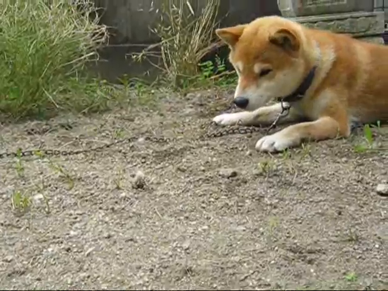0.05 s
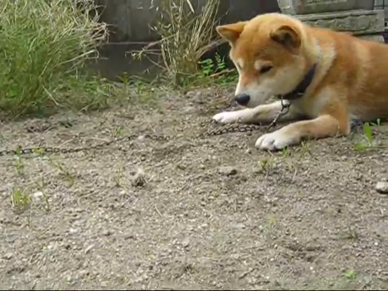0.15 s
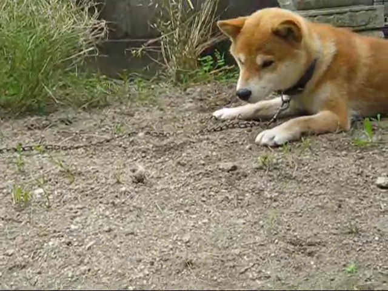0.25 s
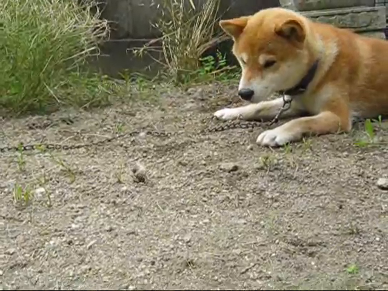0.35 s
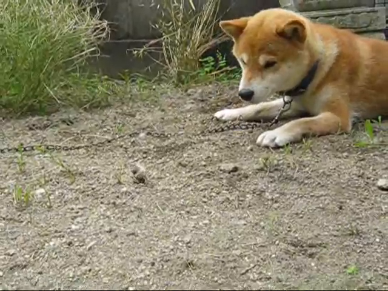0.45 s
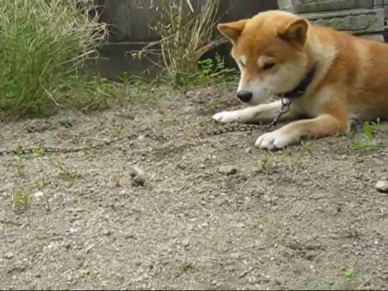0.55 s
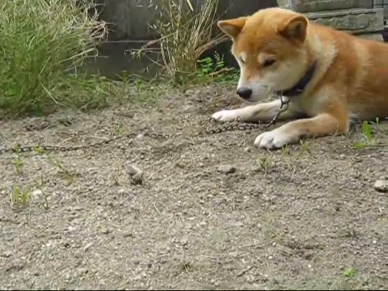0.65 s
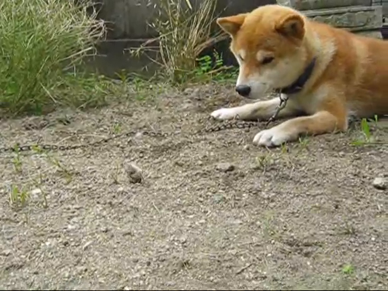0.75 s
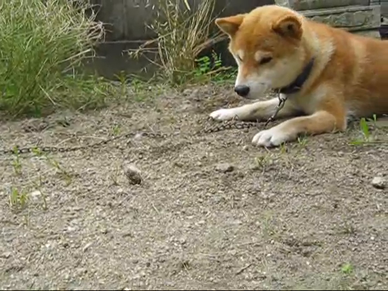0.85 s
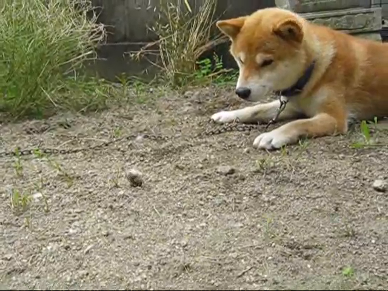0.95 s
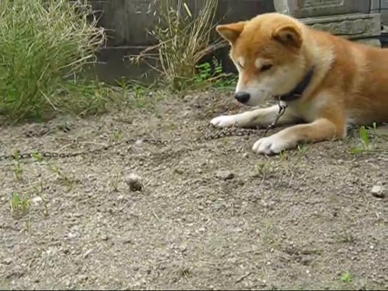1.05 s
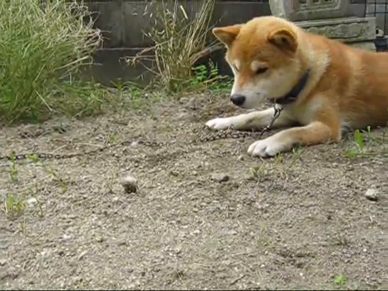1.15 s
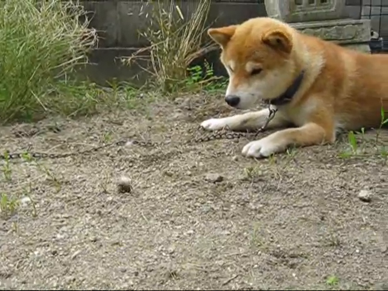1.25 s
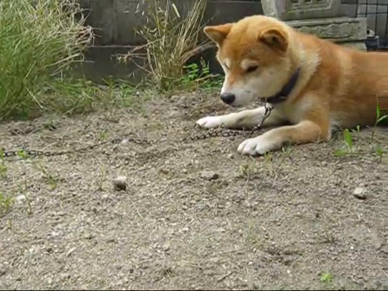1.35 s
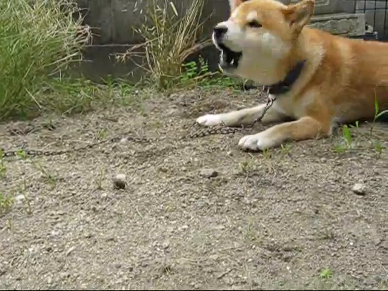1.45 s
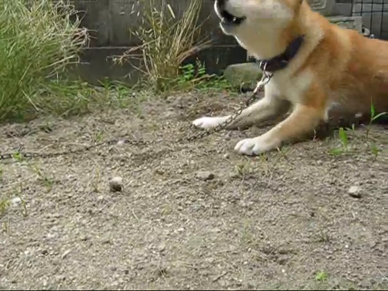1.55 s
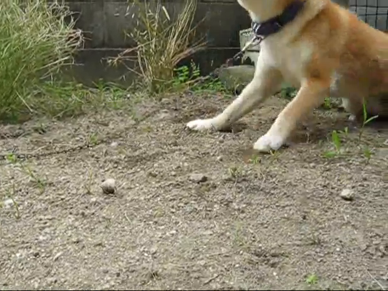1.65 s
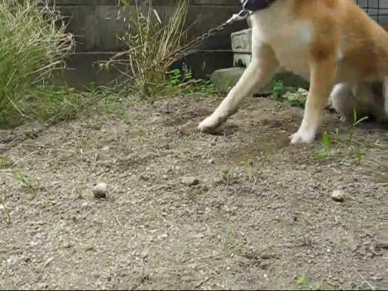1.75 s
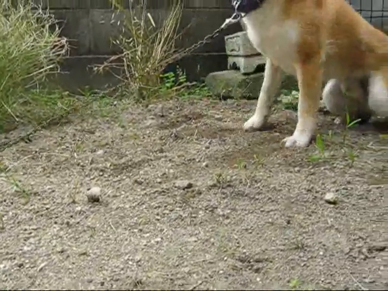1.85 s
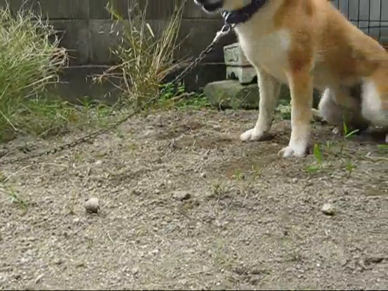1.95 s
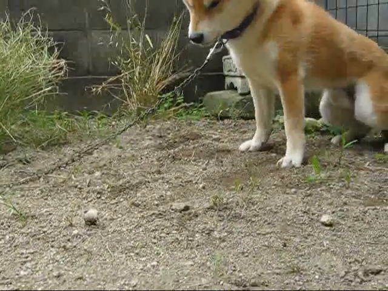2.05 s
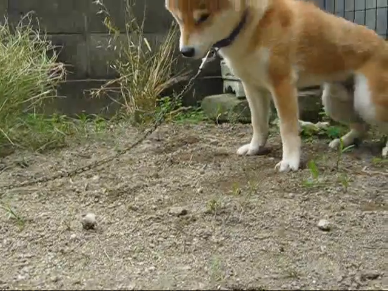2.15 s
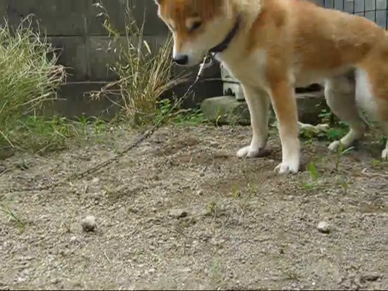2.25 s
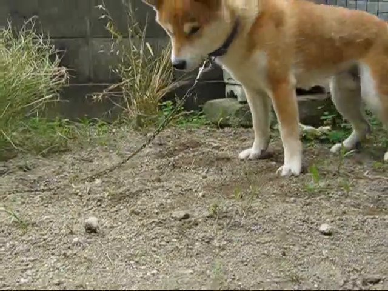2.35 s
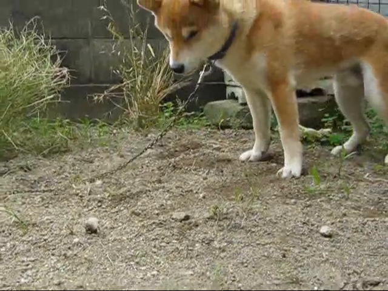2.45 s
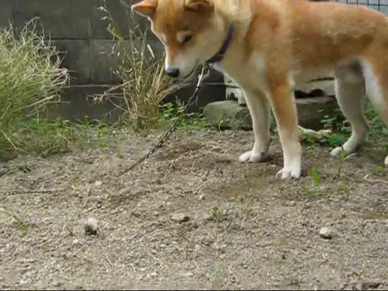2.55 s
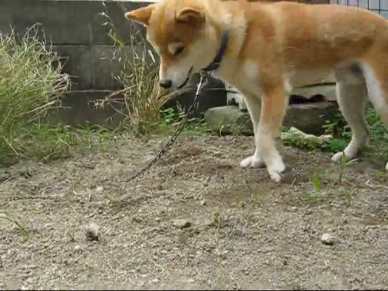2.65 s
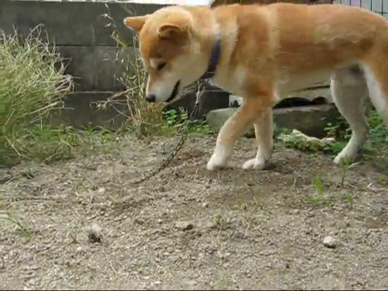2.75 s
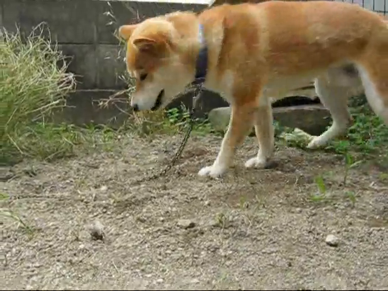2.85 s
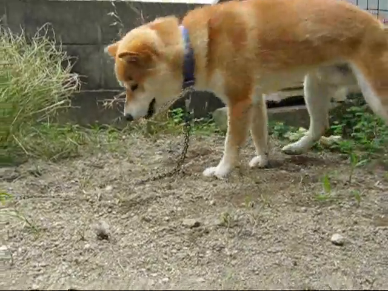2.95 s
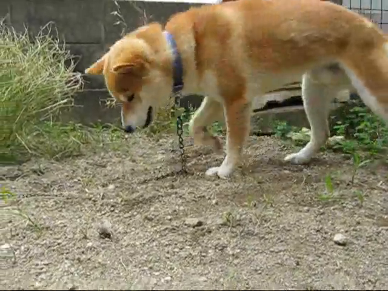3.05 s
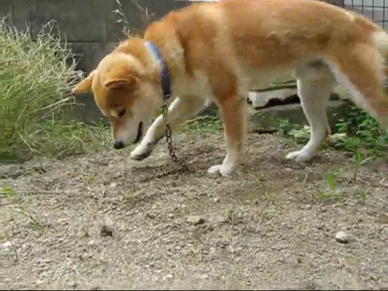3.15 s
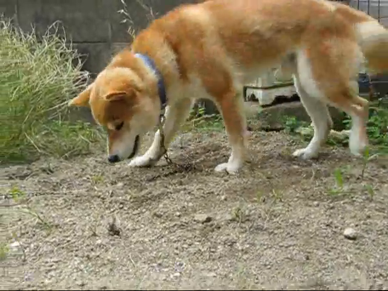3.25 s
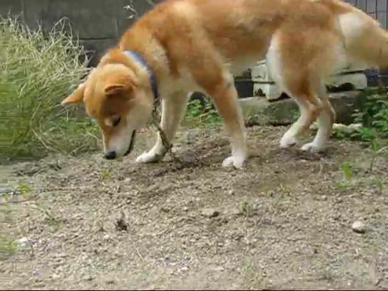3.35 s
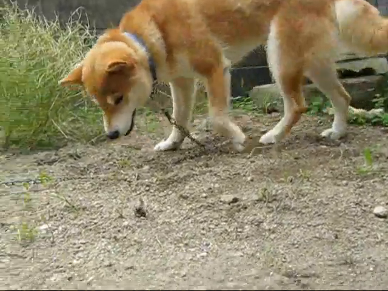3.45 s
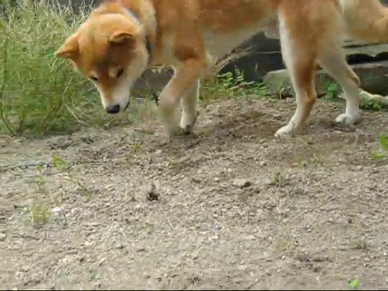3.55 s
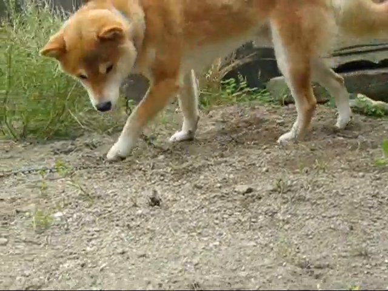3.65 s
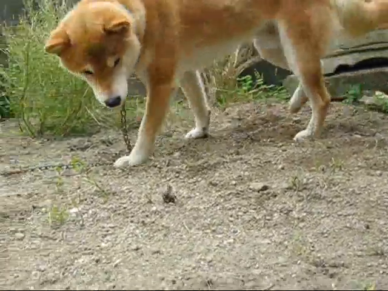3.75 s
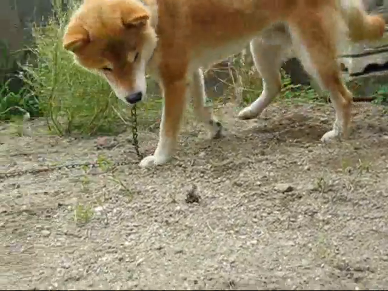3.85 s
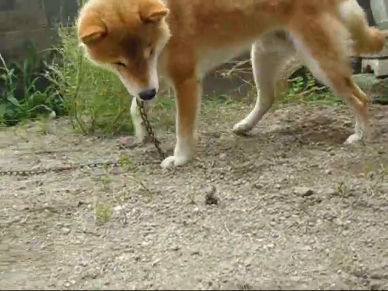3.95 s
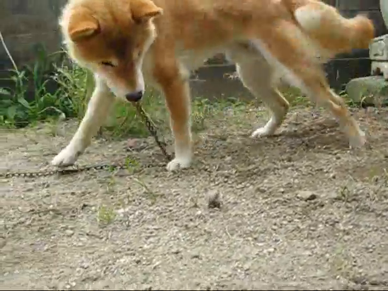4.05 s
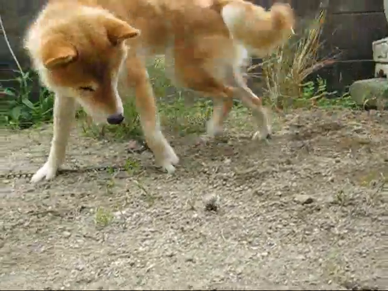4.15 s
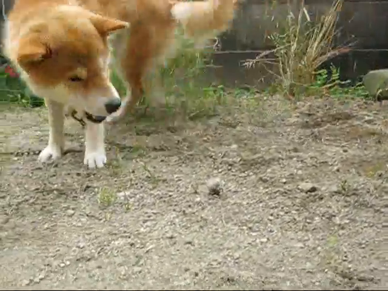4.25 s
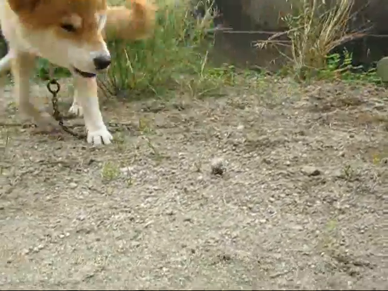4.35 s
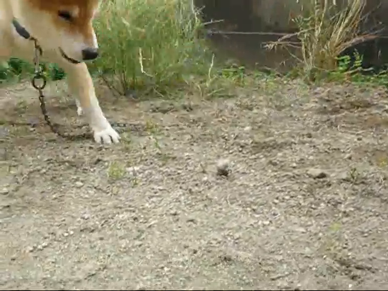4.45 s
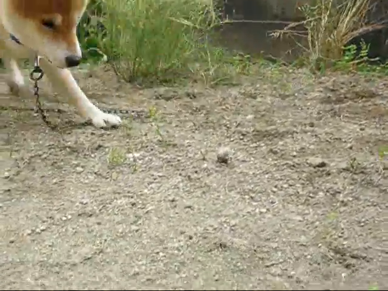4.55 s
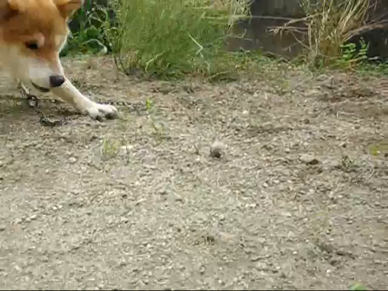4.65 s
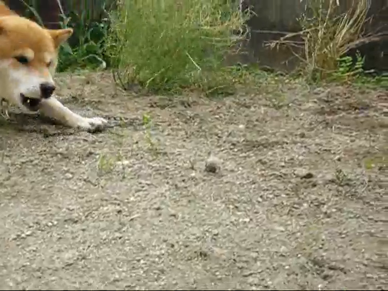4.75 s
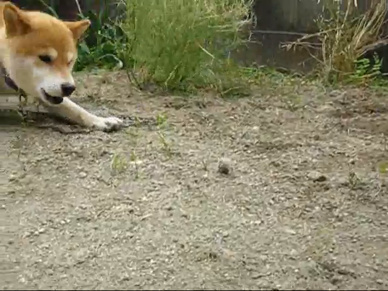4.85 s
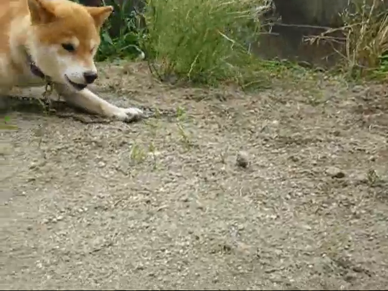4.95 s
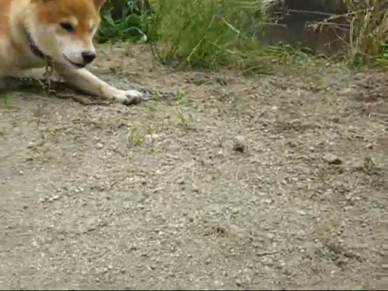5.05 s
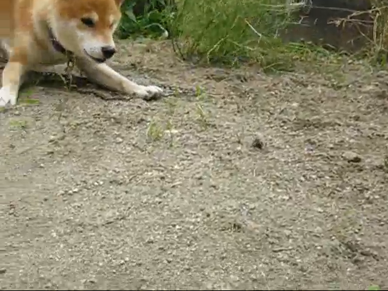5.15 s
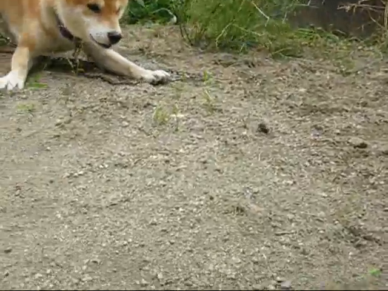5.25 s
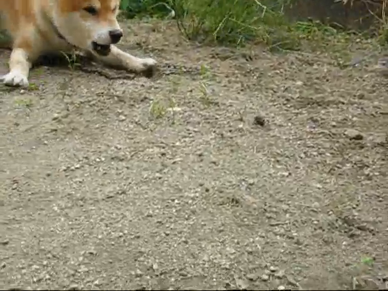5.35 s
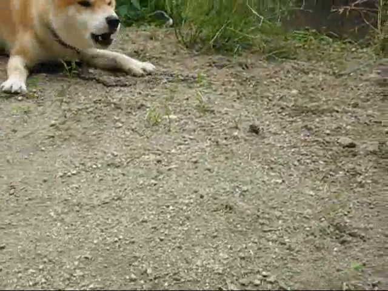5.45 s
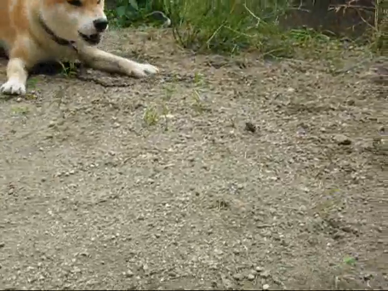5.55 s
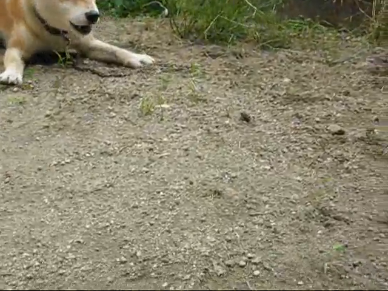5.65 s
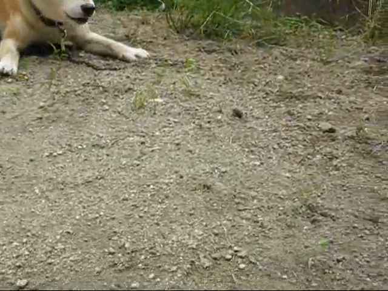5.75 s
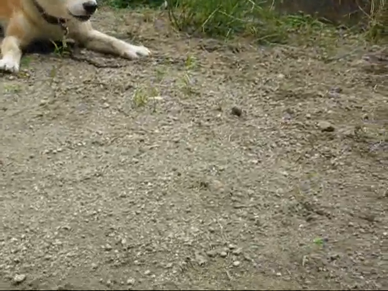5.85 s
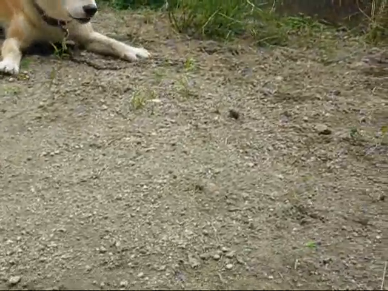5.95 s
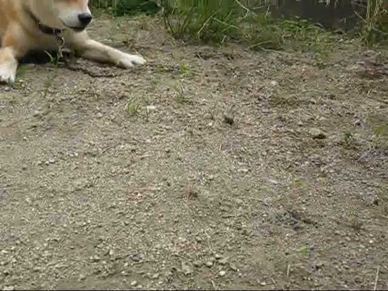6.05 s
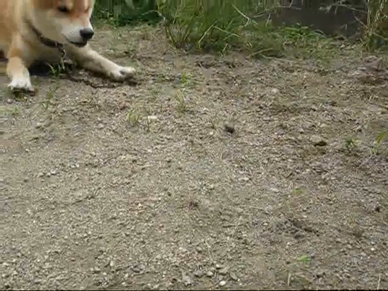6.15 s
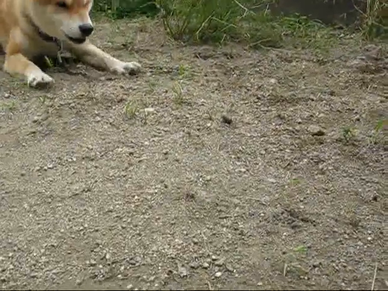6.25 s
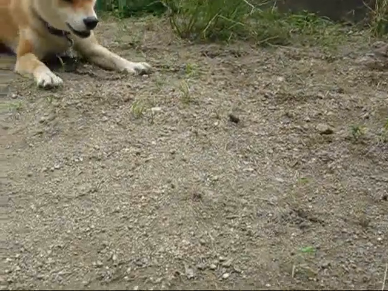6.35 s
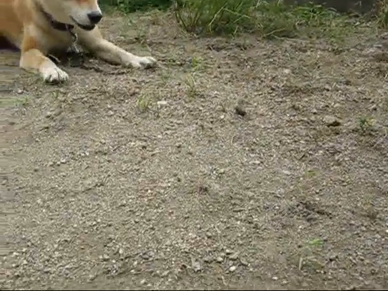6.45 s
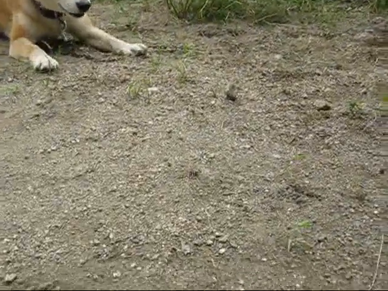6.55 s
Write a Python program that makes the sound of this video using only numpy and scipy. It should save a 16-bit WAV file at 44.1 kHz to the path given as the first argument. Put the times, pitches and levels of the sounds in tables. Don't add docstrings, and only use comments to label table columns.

```python
import sys
import numpy as np
from scipy import signal
from scipy.fft import rfft, irfft
from scipy.io import wavfile
from scipy.ndimage import uniform_filter1d

SR = 44100
rng = np.random.default_rng(int(sys.argv[2]) if len(sys.argv) > 2 else 0)


def wav_record(signal):
    frames = np.transpose(np.atleast_2d(signal))
    bounded = np.clip(frames, -1, 1)
    quanta = np.round(bounded * 32767).astype(np.int16)
    wavfile.write(sys.argv[1], SR, quanta)


def voltage_ratio(level):
    return 10 ** (np.asarray(level, float) / 20)


N = 291060
T = np.arange(N) / SR


def smooth(x, seconds):
    return uniform_filter1d(x, max(int(seconds * SR), 1))


def unit(x):
    return x / np.sqrt(np.mean(x ** 2))


def high_or_band(x, order, hz, kind):
    return signal.sosfilt(signal.butter(order, hz, kind, fs=SR, output="sos"), x)


def wobble(hz):
    return unit(high_or_band(rng.standard_normal(N), 2, hz, "low"))


def narrow(hz, width_hz):
    phase = 2 * np.pi * np.cumsum(hz) / SR
    return wobble(width_hz / 2) * np.sin(phase) + wobble(width_hz / 2) * np.cos(phase)


def resonate(x, hz, width_hz):
    r = np.exp(-np.pi * width_hz / SR)
    poles = [1, -2 * r * np.cos(2 * np.pi * hz / SR), r * r]
    return signal.lfilter(np.array([1, 0, -1]) * (1 - r * r) / 2, poles, x)


def chatter():
    out, draws = np.zeros(N), rng.random((110, 5))
    for when, long, pitch, glide, loud in draws:
        i, n = int(when * (N - SR // 10)), int((0.005 + 0.044 * long) * SR)
        hz = (3000 + 3200 * pitch) * np.linspace(1, 0.66 + 0.71 * glide, n)
        whistle = np.hanning(n) * np.sin(2 * np.pi * np.cumsum(hz) / SR)
        out[i:i + n] += voltage_ratio(-14.5 + 6.1 * loud) * whistle
    return out


# f/Hz, density/dB per Hz
AIR_COLOUR = [(30, 0.5), (100, -3.5), (250, -3.5), (500, -12), (1000, -14.5), (2000, -16.5), (3500, -18),
              (5500, -16.5)]


def air():
    hz = np.maximum(np.fft.rfftfreq(N, 1 / SR), 1)
    colour_hz, colour_db = np.transpose(AIR_COLOUR)
    colour = voltage_ratio(np.interp(np.log(hz), np.log(colour_hz), colour_db)) * (hz < SR / 8)
    noise = unit(irfft(rfft(rng.standard_normal(N)) * colour, N))
    insect_hz = 3200 + 60 * wobble(1.6)
    insect = voltage_ratio(-17.5 + 3.0 * wobble(5.2)) * narrow(insect_hz, 90)
    return noise * voltage_ratio(1.0 * wobble(5.2)) + chatter() + insect


# top t/s, top f/Hz, level/dB, rise/s, dive/s
CHIRPS = [(.001, 2066, -27, .001, .16), (.181, 2280, -32.5, 0.01, .019), (.213, 1959, -30, 0.019, 0.017),
          (.346, 2398, -30, .019, 0.03), (.494, 2232, -27.5, 0.027, .036),
          (1.326, 1995, -30, 0.035, 0.0062), (2.006, 2060, -51, 0.011, .025),
          (2.151, 1956, -46, 0.023, 0.039), (2.879, 1794, -35, .032, .008), (3.04, 1990, -33.5, .01, 0.024),
          (3.062, 1687, -34, 0.014, 0.095), (3.233, 2057, -32, .011, 0.019),
          (3.266, 1658, -35, 0.012, 0.017), (3.405, 2113, -28.5, 0.016, 0.039),
          (3.569, 2050, -28.5, 0.025, 0.034), (3.717, 1877, -31, 0.021, 0.042)]


def bird():
    start_hz, end_hz, fastest_dive_hz_per_s, longest_dive_s = 1560, 1417, 45000, 0.035
    swell_db, fade_db_per_s, octave_db = 15.5, 290.5, -27.0
    out = np.zeros(N)
    for s, top_hz, db, rise, dive in CHIRPS:
        on = (T > s - rise) & (T < s + min(dive, longest_dive_s))
        age = T[on] - s
        up, down = np.clip(-age / rise, 0, 1), np.clip(age / dive, 0, 1)
        drop_hz = min(top_hz - end_hz, fastest_dive_hz_per_s * dive)
        hz = top_hz - (top_hz - start_hz) * up ** 1.5 - drop_hz * np.sin(np.pi * down / 2) ** 2
        phase = 2 * np.pi * np.cumsum(hz) / SR
        level = voltage_ratio(db - swell_db * up ** 2 - fade_db_per_s * np.clip(age, 0, None))
        level = level * signal.windows.tukey(len(age), .25)
        out[on] += np.sqrt(2) * level * (np.sin(phase) + voltage_ratio(octave_db) * np.sin(2 * phase))
    return out


# t/s, f/Hz, glide/end over start, level/dB
TWITTER = [(.04, 3900, 0.92, -46.5), (0.086, 4050, 0.75, -47), (.088, 5000, 0.94, -47),
           (.255, 3500, 1.4, -46.5), (0.304, 3800, 1.05, -45), (.35, 3700, 1.44, -44.5),
           (0.464, 4150, .81, -44), (.485, 4600, 1.38, -48), (.504, 5500, 1.1, -36.5),
           (.524, 4950, 0.99, -43.5), (0.582, 5150, 1.07, -43), (.755, 3850, 0.57, -44),
           (.83, 4600, 1.16, -44), (1.101, 4450, 1.17, -43.5), (1.175, 3800, 1.28, -42),
           (1.281, 4050, 1.2, -41.5), (1.447, 5250, 1.06, -33), (3.005, 4980, 1.36, -42.5),
           (3.11, 3670, 0.85, -46), (3.205, 4880, 1.16, -41), (3.215, 3930, 1.05, -41),
           (3.267, 5180, 0.94, -41.5), (3.292, 4250, 1.2, -42), (3.413, 4920, 0.94, -37),
           (3.678, 2900, 1.3, -40.5), (3.684, 4880, 0.77, -38.5), (4.105, 3950, 1.2, -42),
           (5.308, 2510, 1.09, -55.5), (6.283, 2520, 0.76, -44), (6.51, 3200, 1.2, -46),
           (.085, 3120, 1.1, -60), (.313, 3960, .9, -49), (.4, 3880, 1.1, -49), (.505, 2710, 1.07, -45.5),
         (.8, 2650, 0.94, -48), (.8, 3620, 0.75, -46.5), (1.055, 4400, 1.5, -52), (1.38, 3200, 1.1, -44.5),
         (1.41, 3350, 0.87, -53), (3.173, 3320, 0.89, -48), (3.4, 3200, 1.3, -43), (3.55, 4330, 1.3, -45.5),
         (3.595, 5030, 0.87, -44), (4.108, 1772, 0.86, -44.5), (5.97, 3770, 1.1, -54.5),
         (6.047, 2634, 1.1, -57), (6.13, 3776, .94, -50.5), (6.169, 4320, 1.22, -50.5),
         (6.458, 4040, 1.0, -53)]


def twitter():
    whistle_s = .026
    out, tremble, n = np.zeros(N), 1 + .018 * wobble(120), int(whistle_s * SR)
    for s, mid_hz, glide, db in TWITTER:
        i = int(s * SR)
        hz = mid_hz * glide ** np.linspace(-.5, .5, n) * tremble[i:i + n]
        out[i:i + n] += voltage_ratio(db) * np.hanning(n) ** 0.29 * np.sin(2 * np.pi * np.cumsum(hz) / SR)
    return out


# t/s, length/s, level/dB, mouth ring f/Hz,
# ring level/dB
HUFFS = [(0.609, 0.18, -32.5, 4060, -5), (2.548, 0.12, -57, 889.6, 11), (2.609, 0.15, -43.5, 2730, -5.5),
         (3.35, 0.092, -42, 668, 1.5), (3.706, 0.11, -42.5, 964, 3.5), (3.84, 0.13, -28.5, 612, -13.5),
         (4.006, .016, -44, 696, 3), (4.054, 0.067, -43, 3000, -0.5), (4.188, 0.2, -41, 2980, -3),
         (6.266, 0.015, -47.5, 2500, 5.5), (6.29, 0.15, -38.5, 1840, -7.5), (6.534, 0.075, -43, 2500, 1)]
# f/Hz, width/Hz, level/dB
NOSE = [(779, 160, -8.5), (1404, 46, -0.5), (1877, 80, -5), (2230, 54, -24), (3390, 150, -9.5),
        (4300, 200, -9.5), (4770, 100, -39.5)]


def huffs():
    grain_db, tilt_db_per_octave, nose_shut_db_per_octave = 0.5, 0.15, -10.5
    breath, out = rng.standard_normal(N) * voltage_ratio(grain_db * wobble(90)), np.zeros(N)
    ways = [(hz, 1, voltage_ratio(db) * unit(resonate(breath, hz, width_hz))) for hz, width_hz, db in NOSE]
    hiss = [(700, -6), (2500, -11.5), (4500, -17.5)]
    ways += [(hz, 0, voltage_ratio(db) * unit(resonate(breath, hz, hz))) for hz, db in hiss]
    for s, length, level_db, ring_hz, ring_db in HUFFS:
        tilt_db = tilt_db_per_octave * np.log2(ring_hz / 1200)
        nose_db = nose_shut_db_per_octave * max(np.log2(ring_hz / 2000), 0)
        on = (T > s) & (T < s + length)
        shape = np.interp((T[on] - s) / length, [0, .14, .45, 1], [0.03, 0.75, 0.58, 0.018])
        ring = resonate(resonate(breath[on], ring_hz, .18 * ring_hz), ring_hz, .3 * ring_hz)
        total = voltage_ratio(ring_db) * unit(ring)
        for hz, nasal, way in ways:
            total = total + way[on] * voltage_ratio(tilt_db * np.log2(hz / 1400) + nasal * nose_db)
        out[on] += voltage_ratio(level_db) * shape * total
    return out


# t/s, f/Hz, voice level/dB, hoarse level/dB, mouth opening/0-1
HOWL = [
    [(1.462, 360.7, -30.5, -31, 0), (1.469, 473.4, -21, -11.5, 0.05), (1.485, 617.5, -19.5, -20, 0.66),
     (1.512, 768.8, -20, -16, 0.99), (1.55, 691, -13, -17, 1.05), (1.58, 664.1, -12, -28.5, 1),
     (1.625, 589, -16.5, -40, 0.83), (1.64, 567, -16.5, -25.5, 0.34)],
    [(1.64, 575, -16, -27, 0.3), (1.66, 567, -16.5, -49.5, 0.5), (1.716, 626, -15.5, -53, 0.3),
     (1.76, 615.6, -13.5, -53, 0.3), (1.856, 579.7, -16, -50, 0.58), (1.869, 584.3, -21, -23, .1),
     (1.9, 558.9, -22.5, -32, 0), (1.94, 514.4, -27.5, -38, 0.01), (1.97, 510.7, -44, -47.5, .12)],
]
# t/s, f/Hz, voice level/dB, hoarse level/dB, mouth opening/0-1
BARKS = [
    [(4.27, 449, -43, -34.5, 0.1), (4.279, 481, -17, -21.5, .3), (4.35, 694, -13.5, -19, 0.82),
     (4.384, 682.4, -9.5, -22.5, .75), (4.405, 625, -14.5, -24, 0.5), (4.428, 568.3, -22.5, -27, 0.6),
     (4.445, 510, -32.5, -36.5, 0.4)],
    [(4.726, 442.4, -42.5, -43.5, .2), (4.752, 517.6, -19.5, -19, .35), (4.8, 647.2, -17.5, -16, 0.8),
     (4.827, 710.7, -12, -14, .7), (4.86, 644.1, -14, -17, 0.4), (4.868, 632, -22.5, -29, .2),
     (4.905, 608, -34, -38, 0.3)],
    [(5.402, 542, -34.5, -38, .5), (5.422, 626.7, -26, -23.5, 0.71), (5.485, 717.2, -23, -16.5, 0.87),
     (5.535, 707, -19, -18, 0.65), (5.555, 678, -28, -26.5, 0.5), (5.575, 683, -45.5, -39.5, .3)],
]


def calls():
    out = np.zeros((4, N))
    out[1:3] = -120
    for rows in HOWL + BARKS:
        s, *values = np.transpose(rows)
        on = (T >= s[0]) & (T <= s[-1])
        out[:, on] = [np.interp(T[on], s, v) for v in values]
    return out


# t/s, f/Hz, sag/Hz per s
MOUTH_RING = [
    (1.47, 1671, 4500),
    (1.86, 1620, 2800),
    (4.28, 1560, 3200),
    (4.73, 1322, 900),
    (5.41, 1545, 2600),
]


def mouth_ring():
    lowest_hz = 989.4
    hz = np.full(N, float(MOUTH_RING[0][1]))
    for s, start_hz, sag_hz_per_s in MOUTH_RING:
        on = T > s - .02
        hz[on] = np.maximum(start_hz - sag_hz_per_s * np.clip(T[on] - s, 0, None), lowest_hz)
    return hz


def voice_tone(hz, voice_db, rough, mouth, phase):
    partial_db = [voice_db]
    for shut_db, wide_db in ((-10, -20.5), (-20.5, 10)):
        partial_db.append(voice_db + shut_db + wide_db * mouth ** 2)
    shimmer = voltage_ratio(3.5 * rough * wobble(100) + 1.2 * wobble(8.8))
    tone = 0
    for k, db in enumerate(partial_db):
        level = smooth(voltage_ratio(db + 1.1 * k * wobble(33)), 0.0036)
        tone = tone + level * np.sin((k + 1) * phase - k * (0.74 + .5 * wobble(2.9)))
    upper = 0
    for k, db in LADDER:
        wide_db = (k < 6) * 12.5 * mouth ** 2 * (1.5 - rough)
        upper = upper + voltage_ratio(db + 3.3 * wobble(20) + wide_db) * np.sin(k * phase)
    return np.sqrt(2) * shimmer * (tone + upper * smooth(voltage_ratio(voice_db), 0.0035))


def hoarseness(hz, mouth, phase):
    cycles = np.floor(phase / (2 * np.pi) + .12 * wobble(300))
    closing = np.diff(cycles, prepend=0) > 0
    puffs = unit(closing * voltage_ratio(4.0 * rng.standard_normal(N))) + 1.2 * rng.standard_normal(N)
    hoarse = voltage_ratio(-4.5) * narrow(mouth_ring(), 110)
    hoarse = hoarse + voltage_ratio(-0.5) * narrow(smooth(hz, 0.0078) * 1.05, 200)
    for k, (centre_hz, width_hz, db) in enumerate(THROAT):
        opening = voltage_ratio(13.0 * (mouth - 1.0) * np.log2(centre_hz / 700) ** 2 * 0.68)
        ring = resonate(resonate(puffs, centre_hz, width_hz), centre_hz, 2 * width_hz)
        hoarse = hoarse + (-1) ** k * voltage_ratio(db) * opening * unit(ring)
    return high_or_band(hoarse, 3, 420, "high")


# f/Hz, width/Hz, level/dB
THROAT = [(915, 200, -5.5), (1176, 180, -9), (1653, 190, -7.5), (2028, 270, -6), (2500, 440, -12),
          (3210, 570, -10), (4400, 1000, -40.5)]
# multiple of pitch, level/dB re first
LADDER = [(4, -36.5), (5, -38.5), (6, -38.5), (7, -32.5), (8, -53.5)]


def voice():
    hz, voice_db, noise_db, mouth = calls()
    hz = np.interp(T, T[hz > 0], hz[hz > 0])
    rough = np.clip(voltage_ratio(noise_db - voice_db), 0, 1)
    jitter = 1 + .004 * wobble(40) + .095 * rough * wobble(150)
    phase = 2 * np.pi * np.cumsum(smooth(hz, 0.011) * jitter) / SR
    tone = voice_tone(hz, voice_db, rough, mouth, phase)
    return voltage_ratio(1.0) * tone + smooth(voltage_ratio(noise_db), 0.00067) * hoarseness(hz, mouth, phase)


# t/s, f/Hz, level/dB, t60/s
BURSTS = [
    (1.463, 331, -6.5, 0.033),
    (4.274, 297, -12.5, 0.039),
    (4.282, 282.5, -22.5, 0.098),
    (4.728, 383, -28.5, 0.053),
    (5.404, 298, -33.5, 0.05),
    (5.413, 312, -26, 0.048),
    (5.425, 292, -15, 0.019),
]


def bursts():
    out = np.zeros(N)
    for s, hz, db, t60 in BURSTS:
        age = np.clip(T - s, 0, None)
        out += voltage_ratio(db - 60 * age / t60) * np.sin(2 * np.pi * hz * age)
    return out


def yard(x, t60_s, span_s):
    lag = T[:int(span_s * SR)]
    echoes = rng.standard_normal(len(lag)) * voltage_ratio(-60 * lag / t60_s) * (lag > .008)
    return signal.fftconvolve(x, echoes / np.sqrt(np.sum(echoes ** 2)))[:N]


# t from the low/s, gain/dB
GAIN_AFTER = [(-.14, -13), (-.02, -17), (0, -23), (.015, -16.5), (.1, -17), (.2, -13), (.5, -4), (.9, 0)]
# call start t/s, lowest gain t/s, extra depth/dB
GAIN_LOWS = [
    (1.47, 2.12, -1),
    (4.28, 4.62, 2),
    (4.73, 5.128, -3),
    (5.404, 5.768, -4),
]
# t/s, level/dB
AIR_LEVEL = [(0, -45), (3.6, -44.5), (4.25, -43), (6.6, -44.5)]


def gain_control():
    sink_s = 0.086
    db, (after_s, after_db) = np.zeros(N), np.transpose(GAIN_AFTER)
    for start, low, extra_db in GAIN_LOWS:
        depth_db = np.clip((T - start) / sink_s, 0, 1) * np.interp(T - low, after_s, after_db)
        db = np.minimum(db, depth_db * (1 + extra_db / after_db.min()))
    return voltage_ratio(db + np.interp(T, *np.transpose(AIR_LEVEL)))


def scene():
    background = air()
    birds = bird() + twitter()
    dog = huffs() + voice() + bursts()
    near = voltage_ratio(-18) * yard(dog, .3, 0.35) + voltage_ratio(-5) * yard(birds, .35, 0.13)
    far = voltage_ratio(16) * yard(resonate(dog, 600, 240), 4.3, 1.5)
    return (dog + birds + near + gain_control() * (far + background))[None]


def top_cut(x):
    return signal.sosfilt(signal.butter(12, 16460, fs=SR, output="sos"), x)


def record(dry):
    overload, hold, steps, offset_steps = 0.37, 4, 128, -.32
    x = dry / (1 + np.abs(dry / overload) ** 8.0) ** (1 / 6.9)
    x = x + 0.067 * high_or_band(x ** 2, 2, [90, 260], "band")
    x = high_or_band(x, 2, [45, 5600], "band")
    x = x + voltage_ratio(-67.5) * rng.standard_normal(x.shape)
    samples = np.round(x[:, ::hold] * steps + offset_steps) / steps
    held = np.repeat(samples, hold, axis=1)[:, :N]
    held = signal.sosfiltfilt(signal.butter(12, 15500, fs=SR, output="sos"), held)
    return top_cut(held)


dry = scene()
out = record(dry)
wav_record(out)
```